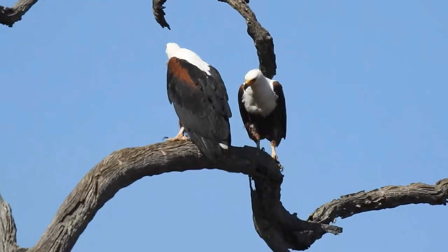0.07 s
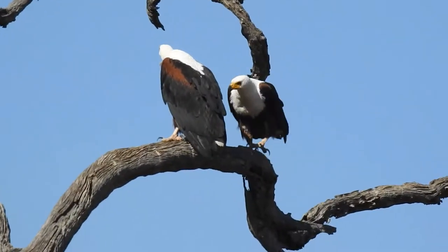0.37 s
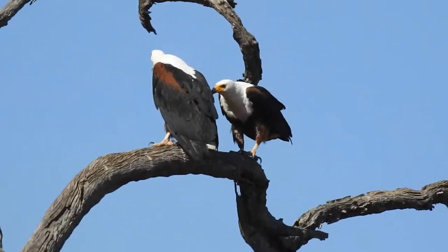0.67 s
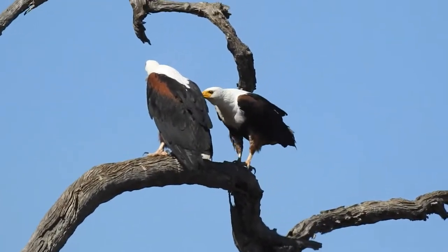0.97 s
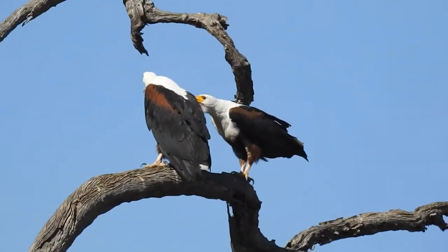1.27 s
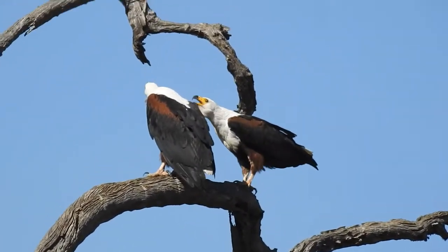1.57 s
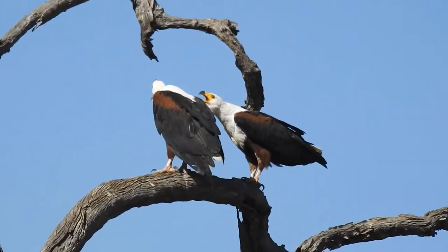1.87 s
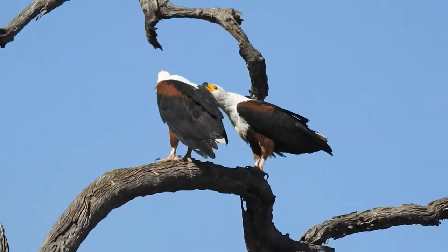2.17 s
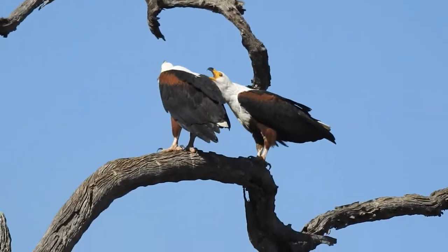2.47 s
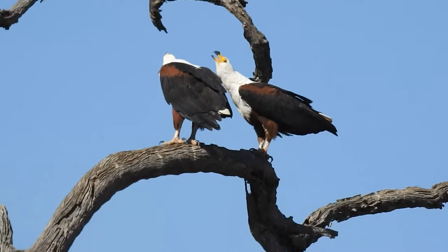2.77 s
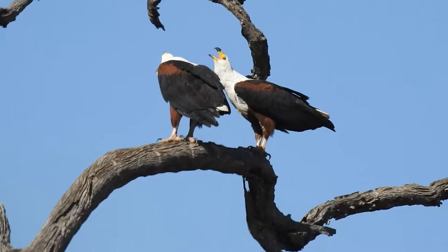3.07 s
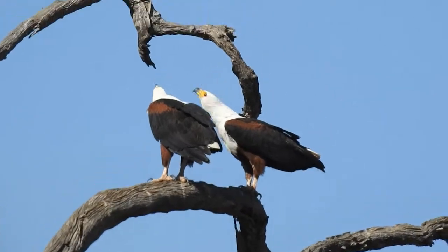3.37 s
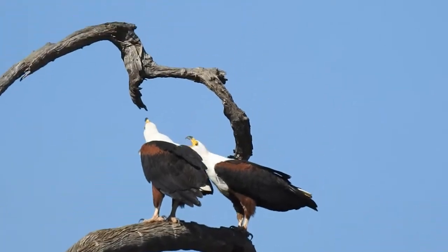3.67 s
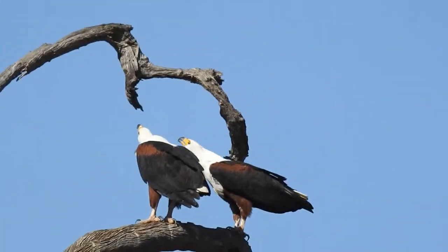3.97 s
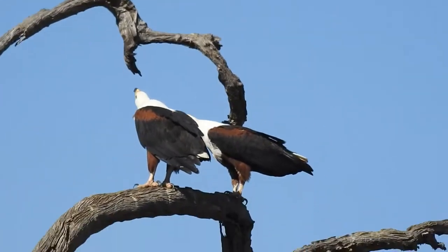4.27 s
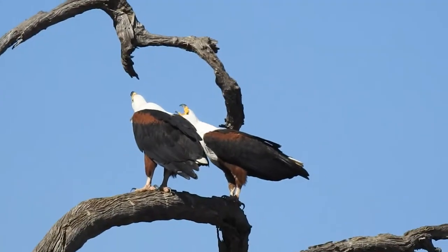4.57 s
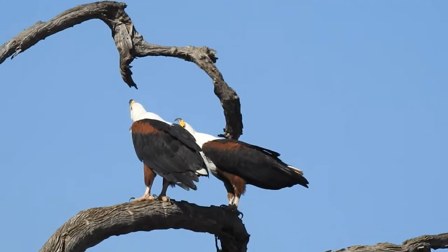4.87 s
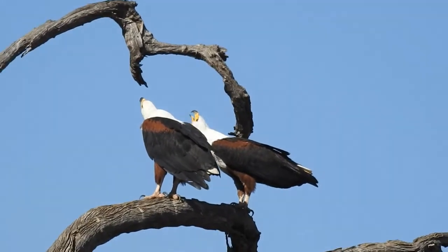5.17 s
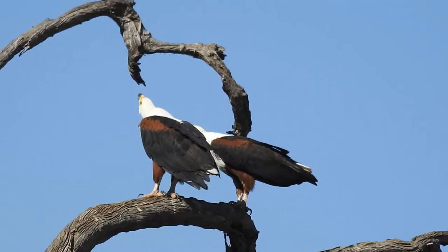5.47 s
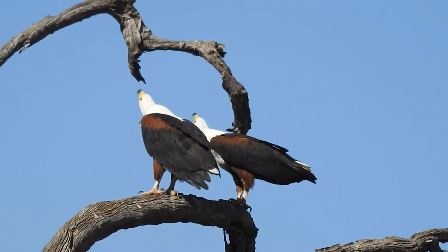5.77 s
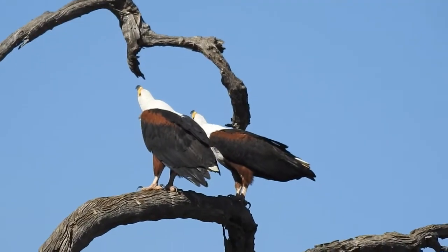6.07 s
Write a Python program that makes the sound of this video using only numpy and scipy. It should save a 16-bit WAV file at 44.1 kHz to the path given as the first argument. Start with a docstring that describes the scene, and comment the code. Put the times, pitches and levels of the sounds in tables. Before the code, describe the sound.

Two fish eagles trade loud, ringing yelps, one clear and high, one hoarse and lower, over faint small bird chirps and soft outdoor air.

```python
"""A small bird chirps over a quiet hush of air in open country; then two fish eagles yelp in duet.
They sit on a dead tree almost straight ahead of the microphone, each syrinx giving a nearly pure tone.
The high voice wails, screams, and yelps: it scoops up, breaks into a higher register and slides down.
The low voice answers hoarsely. Distant trees return the cries, and wind puffs on the microphone."""
import sys
import numpy as np
from scipy import signal
from scipy.fft import rfft, irfft
from scipy.io import wavfile
from scipy.ndimage import uniform_filter1d

SR = 44100
rng = np.random.default_rng(int(sys.argv[2]) if len(sys.argv) > 2 else 0)


def waveform_to_disk(signal):
    """Save audio, clipped to [-1, 1], as 16-bit WAV at the path in sys.argv[1]."""
    frames = np.transpose(np.atleast_2d(signal))
    scaled = np.clip(frames, -1, 1) * 32767
    samples = np.round(scaled).astype(np.int16)
    wavfile.write(sys.argv[1], SR, samples)


N = 269892
TIME = np.arange(N) / SR
RELEASE_S = .013  # time constant of every yelp's ending


def high_eagle():
    """The clear voice: a long wail, a scream and a run of like yelps."""
    # the opening wail: time_s, pitch_hz, fundamental_db, low_overtones_db, high_overtones_db
    wail = [(1.632, 978.6, -43, -56, -69), (1.647, 1180, -41, -50.5, -71), (1.72, 1291, -37, -50, -64),
            (1.8, 1390, -35, -50, -48), (1.965, 1381, -40, -44.5, -43), (2.013, 1366, -47.5, -51, -51),
            (2.065, 1352, -30, -52.5, -49), (2.094, 1347, -36.5, -49.5, -46),
            (2.164, 1337, -22.5, -56.5, -66.5), (2.171, 1120, -41, -56, -50.5), (2.197, 955, -46, -77, -78)]
    # the loudest cry, head thrown back, leaping between registers: columns as in the wail
    scream = [(3.185, 1079, -51.5, -52, -60), (3.194, 1196, -41.5, -30, -51), (3.21, 1335, -27, -36.5, -47),
              (3.243, 1375, -33, -37, -41.5), (3.248, 1702, -24, -40, -44.5),
              (3.273, 1700, -27.5, -31, -45.5), (3.276, 2044, -19.5, -37, -42),
              (3.305, 1940, -20.5, -29, -47), (3.347, 1672, -18.5, -40, -58),
              (3.352, 1500, -27.5, -46, -51), (3.385, 1411, -25.5, -52.5, -50),
              (3.414, 1457, -18.5, -50, -49.5), (3.419, 1651, -22, -46.5, -52),
              (3.46, 1586, -28.5, -54, -45), (3.487, 1497, -35.5, -40, -58)]
    # where the wail and the scream rattle: time_s, half_length_s, depth
    cry_breaks = [(1.64, 0.0054, 0.44), (2.184, 0.011, 0.38), (3.261, 0.015, 0.88), (3.36, .0076, 0.29),
                  (3.425, 0.0034, 0.23), (3.478, .012, .7)]
    # yelps: start_s, jump_s, end_s, top_hz, shelf_hz, last_hz, knee_share, scoop_db, fundamental_db,
    # low_overtones_db, high_overtones_db, dip_s, dip_half_s, dip_db
    yelps = [(2.615, 2.688, 2.94, 1610, 1507, 1303, .65, -29.5, -20, -31, -31, 2.736, 0.027, 13.5),
             (3.81, 3.87, 4.11, 1624, 1477, 1193, .5, -22.5, -22, -38, -38.5, 4.054, .01, 26),
             (4.533, 4.591, 4.845, 1613, 1467, 1223, 0.51, -20.5, -20, -42.5, -41.5, 4.733, 0.032, 19),
             (5.119, 5.168, 5.395, 1575, 1471, 1171, .5, -22, -19.5, -44, -42.5, 5.289, 0.03, 26.5),
             (5.785, 5.837, 6.092, 1591, 1466, 1253, 0.52, -25.5, -22.5, -45, -46.5, 5.941, 0.024, 8)]
    # resonances of the throat and open beak: frequency_hz, gain_db
    throat = [(2700, 7), (3200, 3.5), (3700, 8.5), (4200, -18), (4750, 6), (5200, -9.5), (5500, 9.5),
              (5950, -2.5), (6400, -19), (6900, 5.5), (7400, -29), (8100, -15), (9500, -41), (11000, -47)]
    notes = [np.array(wail), np.array(scream)] + [high_yelp(*row) for row in yelps]
    notes.sort(key=lambda note: note[0, 0])
    breaks, squeaks = list(cry_breaks), []
    for start_s, jump_s, *_, fundamental_db, _, _, _, _, _ in yelps:
        # a yelp rattles at its onset and at the jump, where it overshoots in a squeak
        breaks += [(start_s + .0041, .0091, .3), (jump_s + .007, .0097, .26)]
        squeaks.append((jump_s + .008, .02, fundamental_db - 19, 1978, 68.5))
    voice = syrinx(notes, breaks, throat, split_hz=4200, jitter=.002, shimmer_db=2.6,
                   rattle_hz=335, rattle=.4, chaos=.12, grit=.008)
    return voice + rasps(squeaks)


def high_yelp(start_s, jump_s, end_s, top_hz, shelf_hz, last_hz, knee,
              scoop_db, fundamental_db, low_db, high_db, dip_s, dip_half_s, dip_db):
    """A scoop in the lower register, a jump up and a slide that grows purer, as rows for the syrinx."""
    t = np.linspace(start_s, end_s, num=600)
    scoop_hz = top_hz * (.84 - .165 * np.exp(-(t - start_s) / .013))
    attack_db = 24.5 * np.exp(-(t - start_s) / .009)
    falter_db = 7 * bump(t, jump_s, .007)  # the lower register gives way at the jump
    brightness_db = .67 * (low_db - fundamental_db)
    scoop = [scoop_hz, scoop_db - attack_db - falter_db]
    scoop += [db + brightness_db - attack_db / 2 for db in (-27, -41)]
    progress = np.clip((t - jump_s) / (end_s - jump_s), 0, 1)
    release_db = 25.5 * np.exp((t - end_s) / RELEASE_S)
    upper = [slide(progress, top_hz, shelf_hz, last_hz, knee, ease=2.13, drop=5.6),
             fundamental_db - 1.4 * progress - release_db - dip_db * bump(t, dip_s, dip_half_s),
             low_db - 21 * progress - release_db,
             high_db - 15.5 * progress - release_db]
    jumped = np.clip((t - jump_s) / .0032 + .5, 0, 1)
    return np.column_stack([t] + [a + (b - a) * jumped for a, b in zip(scoop, upper)])


def low_eagle():
    """The hoarse voice: each yelp starts with a rasp and frays at its end."""
    # yelps: start_s, end_s, top_hz, shelf_hz, last_hz, knee_share, scoop_share, fundamental_db,
    # low_overtones_db, high_overtones_db, dip_s, dip_db, hoarse_half_s, hoarse_depth, rasp_db
    yelps = [(1.925, 2.141, 1083, 845, 680.5, .99, 0.04, -38, -56.5, -68.5, 1.98, 8.5, .1, 0.9, -48.5),
             (2.426, 2.609, 883, 830, 641.3, .9, .09, -36.5, -45, -50, 2.52, 0.5, 0.018, 0.2, -39.5),
             (2.868, 3.125, 1062, 947, 698.4, .7, .06, -32, -43.5, -45, 3.013, 19, .015, 0.6, -42),
             (3.478, 3.822, 1143, 888.5, 726.4, .6, .12, -31, -43, -47, 3.634, 11, 0.0083, .55, -33),
             (4.327, 4.47, 690, 668, 598.4, .8, .12, -50, -51, -63.5, 4.38, 7, 0.18, 0.3, -68),
             (4.87, 5.14, 1089, 969.4, 651, .6, 0.22, -32, -39, -48.5, 5.024, 7, 0.012, 0.6, -43.5),
             (5.554, 5.88, 1022, 818, 641, .68, 0.26, -35.5, -42.5, -58, 5.742, 1.5, .021, 0.3, -40.5)]
    # resonances of the throat and open beak: frequency_hz, gain_db
    throat = [(2000, 7), (2600, -7.5), (3150, 7.5), (3600, -9.5), (4000, -8.5), (4400, 6), (4900, -9),
              (5300, -7), (5800, 7.5), (6400, -21), (7000, -7), (7800, -41), (10000, -42)]
    rasp_hz, rasp_width_hz = 1434, 550
    notes, breaks, catches = [], [], []
    for start_s, end_s, *shape, hoarse_half_s, hoarse_depth, rasp_db in yelps:
        notes.append(low_yelp(start_s, end_s, *shape))
        hoarse_s = start_s + .008
        breaks += [(hoarse_s, hoarse_half_s, hoarse_depth), (end_s - .015, .02, .26)]
        catches.append((hoarse_s, hoarse_half_s, rasp_db, rasp_hz, rasp_width_hz))
    return rasps(catches) + syrinx(notes, breaks, throat, split_hz=2500, jitter=.0053, shimmer_db=2.5,
                                   rattle_hz=233, rattle=.35, chaos=.62, grit=.021)


def low_yelp(start_s, end_s, top_hz, shelf_hz, last_hz, knee, scoop,
             fundamental_db, low_db, high_db, dip_s, dip_db):
    """One arch in a single register, overtones sounding before the fundamental, as rows for the syrinx."""
    t = np.linspace(start_s, end_s, num=600)
    age_s = t - start_s
    progress = age_s / (end_s - start_s)
    hz = slide(progress, top_hz, shelf_hz, last_hz, knee, ease=2.49, drop=7.2)
    hz *= 1 - scoop * np.exp(-age_s / .033)
    attack_db = 26.5 * np.exp(-age_s / .019)
    release_db = 18.5 * np.exp((t - end_s) / RELEASE_S)
    beak_db = 10.5 * np.exp(-age_s / .021)  # the high overtones swell as the beak opens
    fundamental = fundamental_db - 9 * progress - release_db - attack_db - dip_db * bump(t, dip_s, .019)
    low = low_db - 7 * progress - release_db
    high = high_db - 9 * progress - release_db - beak_db
    return np.column_stack([t, hz, fundamental, low, high])


def slide(progress, top_hz, shelf_hz, last_hz, knee, ease, drop):
    """A yelp's pitch eases down to a shelf by the knee, then falls as the breath runs out."""
    eased = np.sin(np.pi / 2 * np.minimum(progress / knee, 1)) ** ease
    return top_hz + (shelf_hz - top_hz) * eased + (last_hz - shelf_hz) * progress ** drop


def syrinx(notes, breaks, throat, split_hz, jitter, shimmer_db, rattle_hz, rattle, chaos, grit):
    """A nearly pure tone with overtones; at a break a second vibration and chaos shake it."""
    times, *tracks = np.vstack(notes).T
    pitch_hz, fundamental_db, low_db, high_db = (np.interp(TIME, times, track) for track in tracks)
    sounding = np.any([(TIME > n[0, 0] - .006) & (TIME < n[-1, 0] + .006) for n in notes], axis=0)
    gate = uniform_filter1d(uniform_filter1d(sounding * 1., size=300), size=200)
    hz = pitch_hz * (1 + jitter * wander(107.4))
    rough = sum(depth * bump(TIME, time_s, half_s) for time_s, half_s, depth in breaks)
    rattle_phase = phase_of(rattle_hz * (1 + .0399 * wander(80)))
    shake = rattle * np.cos(rattle_phase) + chaos * wander(390, order=4)
    phase = phase_of(hz) + rough * shake + grit * wander(660)
    swell = gate * (1 + rough * (.73 * np.sin(rattle_phase) + .046 * wander(300, order=4)))
    # overtones below and above the split share out their own level through the throat
    harmonics = np.arange(2, 11)[:, None]
    passed = gain_of(spectrum_at(throat, harmonics * hz))
    above = (1 + np.tanh((harmonics * hz - split_hz) / 120)) / 2
    gains = sum(share * gain_of(db) / (np.linalg.norm(share * passed, axis=0) + .041)
                for share, db in [(1 - above, low_db), (above, high_db)])
    # each overtone flickers on its own in the open air
    overtones = sum(gain * gain_of(shimmer_db * wander(48)) * np.sin(k * phase)
                    for k, gain in zip(harmonics, gains))
    # the overtones drop out for the instant of a jump of register
    steady = 1 / (1 + (uniform_filter1d(np.gradient(hz), size=130) / .7) ** 2)
    response = [(500, -35), (1400, -2), *throat, (14000, -80)]
    throat_gain = gain_of(spectrum_at(response, np.fft.rfftfreq(N, 1 / SR)))
    overtones = irfft(rfft(swell * steady * overtones) * throat_gain, N)
    return np.sqrt(2) * (swell * gain_of(fundamental_db) * np.sin(phase) + overtones)


def rasps(rows, octave_db=-19):
    """Chaotic vibration before a voice settles: a noisy band and its octave."""
    out = np.zeros(N)
    for time_s, half_s, level_db, centre_hz, width_hz in rows:
        on = abs(TIME - time_s) < half_s * np.pi
        t = TIME[on]
        real, imag = (wander(width_hz / 2, order=3, size=len(t)) for _ in range(2))
        band = (real + 1j * imag) * np.exp(2j * np.pi * centre_hz * t)
        voice = evened(band.real) + gain_of(octave_db) * evened((band ** 2).real)
        out[on] += gain_of(level_db) * np.exp(-((t - time_s) / half_s) ** 2 / 2) * voice
    return out


def small_birds(trill_hz=115, throb=.22):
    """One bird trills to the right of the microphone with a faint second voice; another whistles."""
    # trilled chirps: start_s, length_s, start_hz, end_hz, level_db
    trills = [(.308, .16, 6580, 7280, -55.5), (1.097, .033, 6370, 6850, -45.5),
              (1.113, 0.096, 6500, 6900, -53), (1.284, 0.07, 5920, 6620, -46),
              (1.429, 0.022, 6300, 6010, -43.5), (1.44, .12, 6130, 6940, -42),
              (1.701, .11, 6030, 6920, -43.5), (4.078, 0.15, 6700, 7050, -56),
              (4.328, 0.19, 6560, 7020, -57)]
    # thin whistles from the centre: columns as in the trills
    whistles = [(1.215, 0.061, 3300, 5130, -56.5), (2.153, .16, 3200, 2110, -63),
                (2.304, 0.065, 3050, 5000, -54), (2.496, 0.07, 3290, 4853, -54.5),
                (2.762, .092, 3250, 4750, -57.5), (6, .021, 4300, 7760, -59)]
    waver = np.sin(phase_of(trill_hz * (1 + .2 * wander(37)))) + .67 * wander(400, order=4)
    two_voices = lambda phase: np.sin(phase) + gain_of(-17) * np.sin(1.23 * phase)
    trilled = sum(chirp(*row, bend=.85, waver_hz=240 * waver, voice=two_voices, left_lag_s=54e-6)
                  for row in trills)
    whistled = sum(chirp(*row, bend=1.4, waver_hz=35 * waver, voice=np.sin) for row in whistles)
    return trilled * (1 + throb * waver) + whistled


def chirp(start_s, length_s, start_hz, end_hz, level_db, bend, waver_hz, voice, left_lag_s=0):
    """One gliding note under a soft arch of level; voice turns its phase into sound."""
    out = np.zeros((2, N))
    on = (TIME >= start_s) & (TIME < start_s + length_s)
    progress = (TIME[on] - start_s) / length_s
    hz = start_hz + (end_hz - start_hz) * progress ** bend + waver_hz[on]
    phase = phase_of(hz) - 2 * np.pi * hz * np.array([[left_lag_s], [0]])
    out[:, on] = gain_of(level_db) * evened(np.sqrt(np.sin(np.pi * progress)) * voice(phase))
    return out


def tree_echoes(calls, t60_s=2.24, dull_hz=2200, taps_per_s=2000, spread=.51):
    """A few distinct returns, then a long, dull scatter from the distant trees."""
    # returns from nearby ground and trees: delay_s, level_db
    echoes = [(0.019, -13), (0.046, -27.5), (.083, -26.5), (0.137, -36)]
    t = TIME[:2 * SR]
    taps = rng.standard_normal((3, len(t))) * (rng.random((3, len(t))) < taps_per_s / SR)
    taps *= gain_of(-60 * t / t60_s) * np.minimum(t / .024, 1)
    tail = taps[0] + spread * taps[1:]
    tail *= gain_of(-22) / np.linalg.norm(tail[0])
    for delay_s, level_db in echoes:
        tail[:, round(delay_s * SR)] += gain_of(level_db)
    tail = signal.lfilter(*signal.butter(1, dull_hz, fs=SR), tail)
    return signal.fftconvolve(calls[None], tail, axes=1)[:, :N]


def air(level_db=-53, rumble_hz=92, patchy_db=2.5):
    """The soft, wide hush of open country, with wind rumbling unevenly on the microphone."""
    # spectrum of the hush: frequency_hz, relative_db
    colour = [(15, -49.5), (25, -17.5), (49, -5), (107, -8), (215, -1.5), (246, -5), (703, -11.5),
              (827, -14), (896, -9.5), (998, -9), (1340, -11.5), (2120, -14.5), (5740, -16), (6560, -15.5),
              (15500, -34.5)]
    # the wind's rumble: time_s, gain_db
    breeze = [(0, -4.5), (1.45, 0.5), (1.8, -17.5), (2.4, -19.5), (2.9, -2.5), (3.6, -18), (4.4, -20),
              (4.8, 3), (5.4, -15), (6.1, -1.5)]
    # puffs on the microphone: time_s, half_length_s, rise_db
    puffs = [(0.264, 0.068, 17), (3.436, 0.045, 19.5)]
    # likeness of left and right: frequency_hz, correlation
    likeness = [(60, 0.16), (150, 0.4), (380, 0.22), (950, 0.52), (2380, 0.13), (5980, 0.047),
                (15000, 0.092)]
    frames, hz = N // 512 + 5, np.fft.rfftfreq(2048, 1 / SR)
    t = np.arange(frames)[:, None] * 512 / SR
    noise = rng.standard_normal((5, frames, len(hz)))
    left, unrelated = noise[0] + 1j * noise[1], noise[2] + 1j * noise[3]
    patches = evened(uniform_filter1d(uniform_filter1d(noise[4], size=8, axis=0), size=10, axis=1))
    same = np.clip(spectrum_at(likeness, hz), -1, 1)
    spectra = np.array([left, same * left + np.sqrt(1 - same ** 2) * unrelated])
    rumble_db = np.interp(t, *np.transpose(breeze))
    rumble_db += sum(rise_db * bump(t, time_s, half_s) for time_s, half_s, rise_db in puffs)
    bass = 1 / (1 + (hz / rumble_hz) ** 4)
    spectra *= gain_of(spectrum_at(colour, hz) + patchy_db * patches + bass * rumble_db)
    spectra[0] *= gain_of(-3 * bass)  # less rumble on the left
    spectra *= hz ** 2 / (hz ** 2 + 32 ** 2)  # the microphone sheds the deepest bass
    _, hush = signal.istft(spectra.transpose(0, 2, 1), nperseg=2048, noverlap=1536)
    return gain_of(level_db) * evened(hush[:, :N])


def far_chorus(centre_hz=996, width_hz=45, level_db=-62):
    """A steady chorus, so far off that it blurs into a faint, narrow drone."""
    phase = 2 * np.pi * centre_hz * TIME
    drone = wander(width_hz / 2) * np.cos(phase) + wander(width_hz / 2) * np.sin(phase)
    return gain_of(level_db) * evened(drone)


def gain_of(db):
    """Decibels to amplitude."""
    return 10 ** (np.asarray(db) / 20)


def evened(x):
    """Scales to an rms of one."""
    return x / np.sqrt(np.mean(x ** 2) + 1e-20)


def phase_of(hz):
    """Running phase in radians of a changing frequency."""
    return 2 * np.pi * np.cumsum(hz) / SR


def spectrum_at(points, hz):
    """Reads a spectrum on a log-frequency axis."""
    point_hz, value = np.transpose(points)
    return np.interp(np.log(hz + 1), np.log(point_hz + 1), value)


def wander(hz, order=2, size=N):
    """Smooth random motion of rms one, rolling off above hz."""
    rolloff = np.sqrt(1 + (np.fft.rfftfreq(size, 1 / SR) / hz) ** (2 * order))
    return evened(irfft(rfft(rng.standard_normal(size)) / rolloff, size))


def bump(t, centre_s, half_s):
    """A bell curve of height one."""
    return np.exp(-((t - centre_s) / half_s) ** 2)


def scene():
    """Both eagles almost straight ahead, small birds nearby, trees and a chorus in the distance."""
    # squeaks and rasps where a voice catches: time_s, half_length_s, level_db, centre_hz, width_hz
    catches = [(1.923, .016, -42, 1790, 70), (2.105, .027, -47, 1130, 190), (2.103, .022, -50, 1560, 210),
               (2.686, .0033, -42, 3200, 2500), (2.874, .017, -42, 2100, 1000),
               (3.266, .009, -26, 2050, 70), (3.262, .009, -31, 3740, 85), (3.263, .01, -39, 4200, 2300),
               (4.879, .007, -31, 1815, 85), (5.582, .008, -35, 1715, 75)]
    eagles = high_eagle() + low_eagle() + rasps(catches)
    chirps = small_birds()
    direct = eagles * gain_of([[-.3], [.3]]) + chirps
    return direct + tree_echoes(eagles + chirps[1]) + air() + far_chorus()


def record(dry):
    """The recorder cuts off the highest treble."""
    lowpass = signal.firwin(511, cutoff=15700, window=("kaiser", 9), fs=SR)
    return signal.oaconvolve(dry, lowpass[None], "same")


dry = scene()
out = record(dry)
waveform_to_disk(out)
```